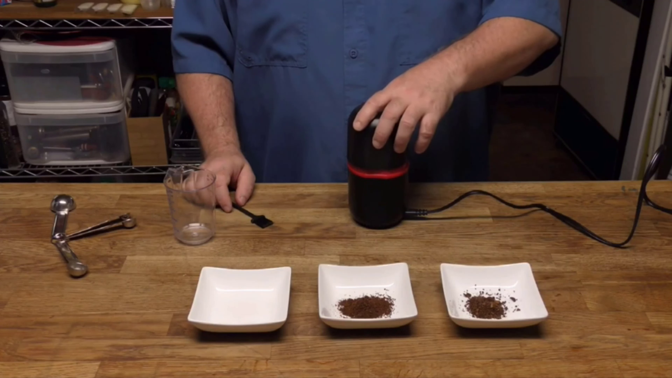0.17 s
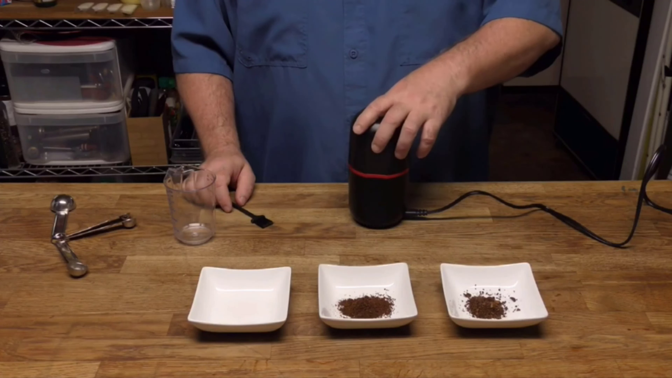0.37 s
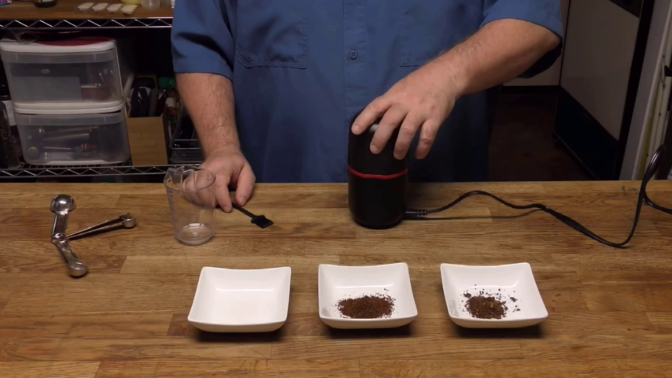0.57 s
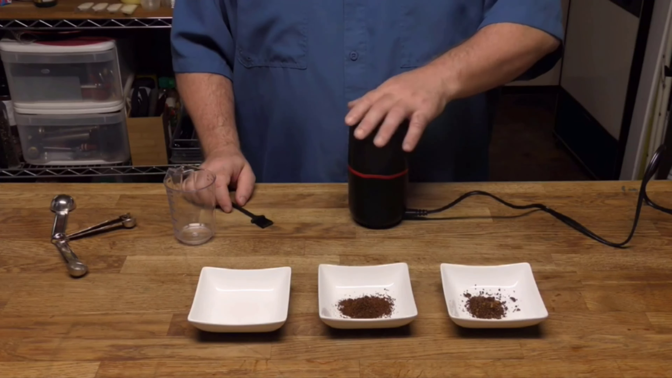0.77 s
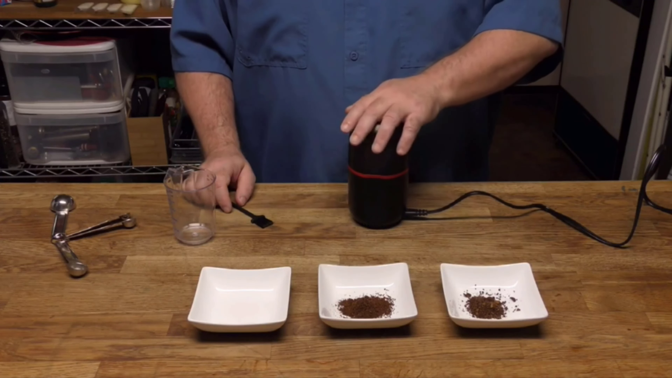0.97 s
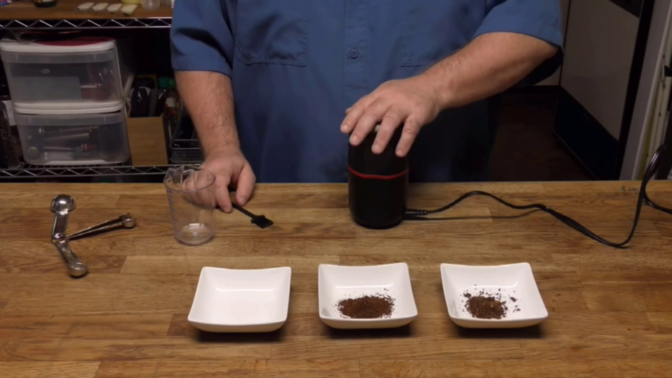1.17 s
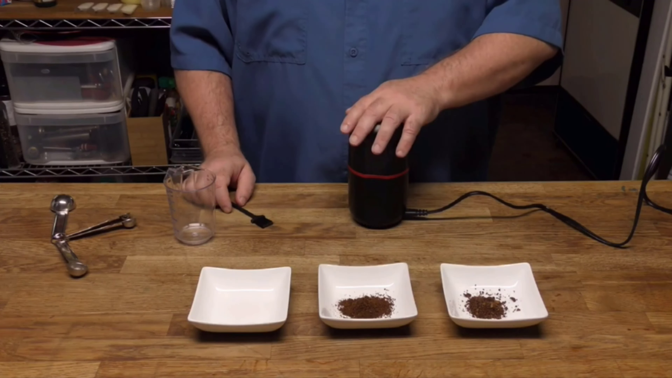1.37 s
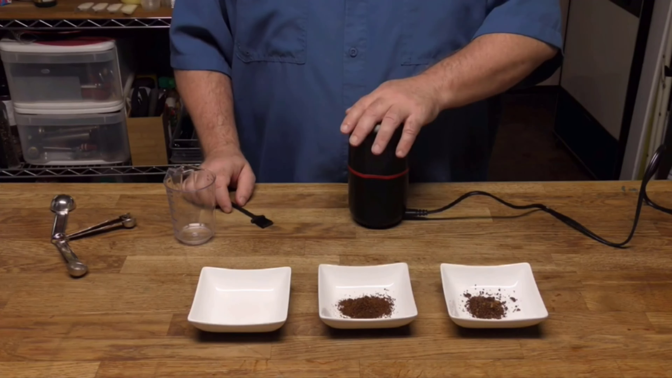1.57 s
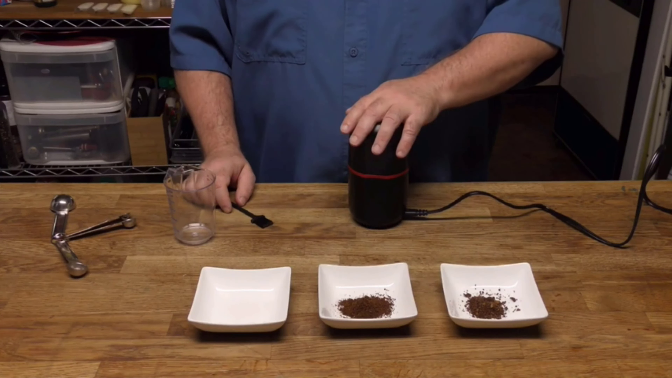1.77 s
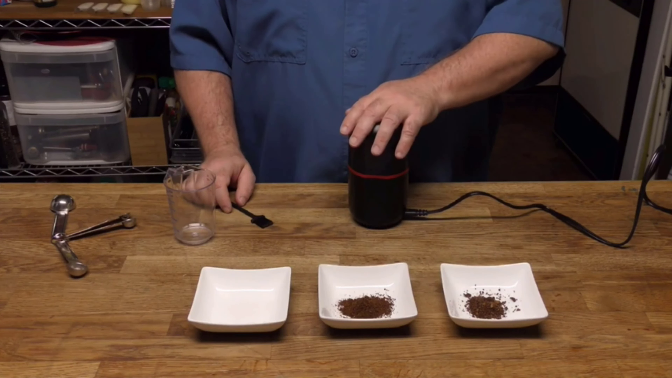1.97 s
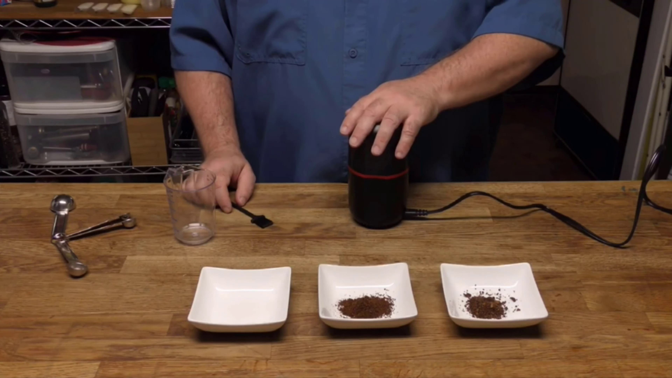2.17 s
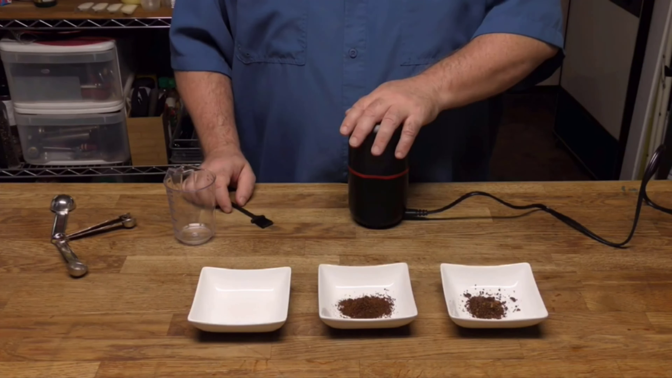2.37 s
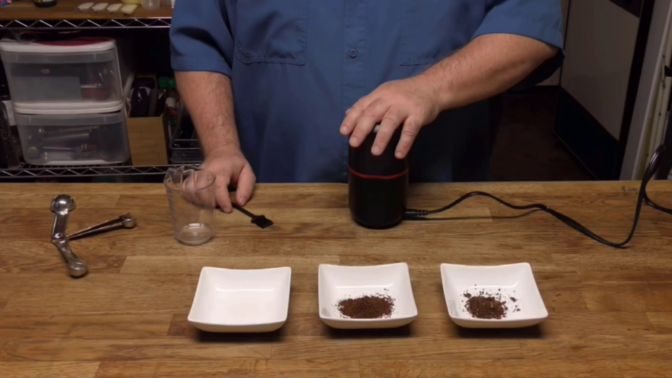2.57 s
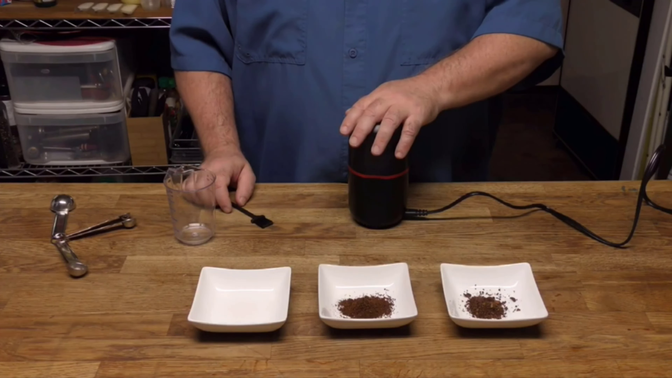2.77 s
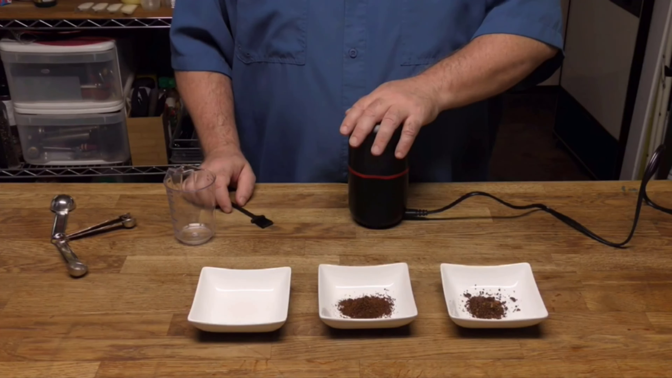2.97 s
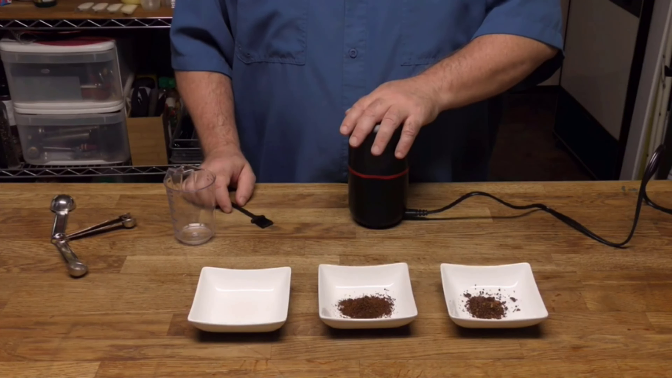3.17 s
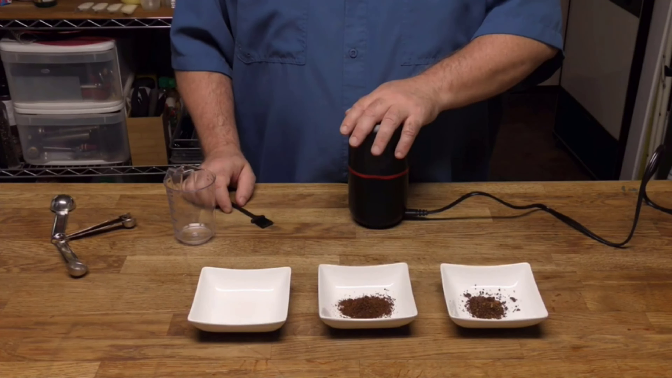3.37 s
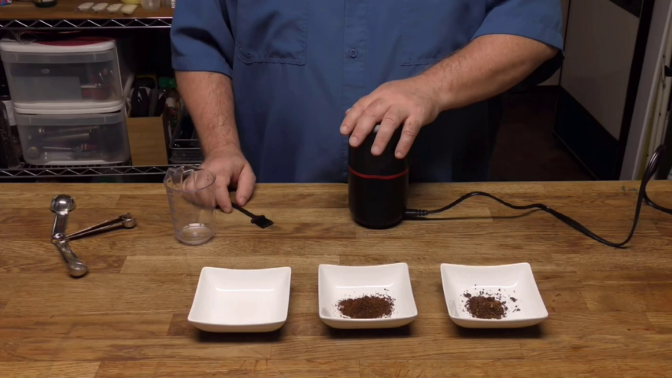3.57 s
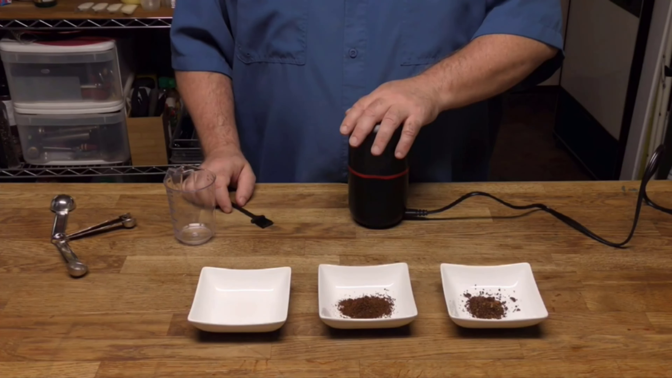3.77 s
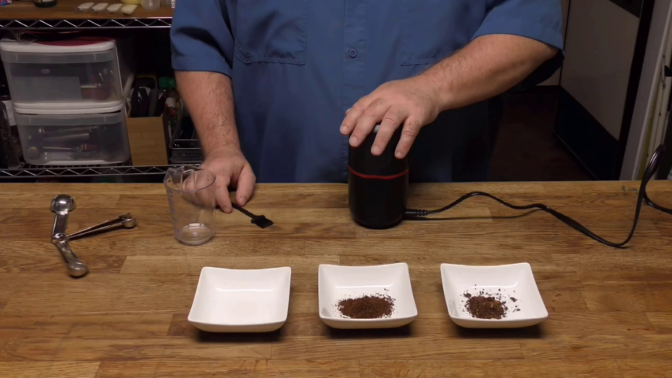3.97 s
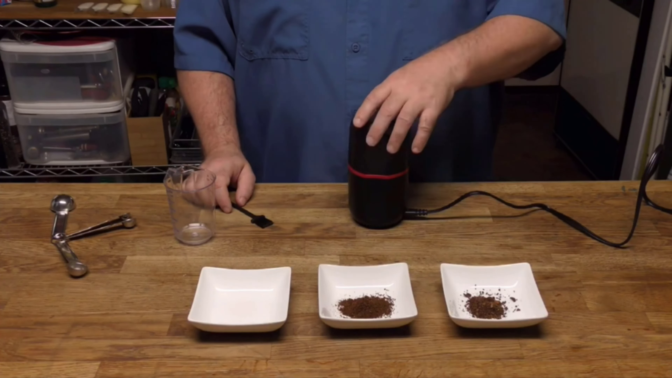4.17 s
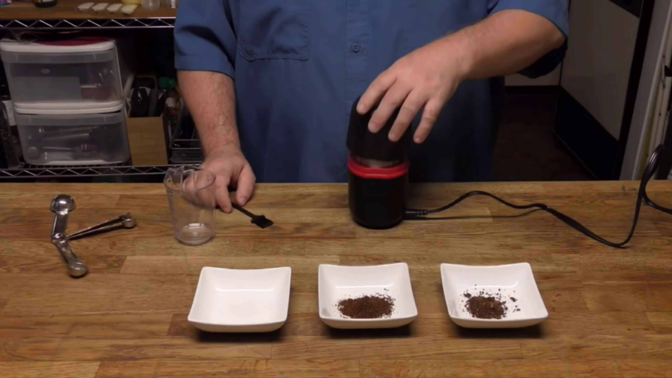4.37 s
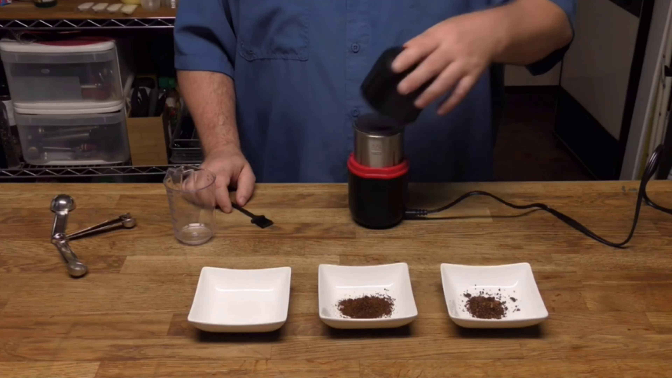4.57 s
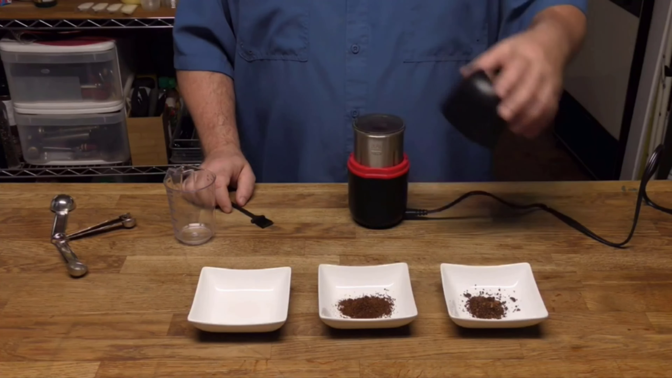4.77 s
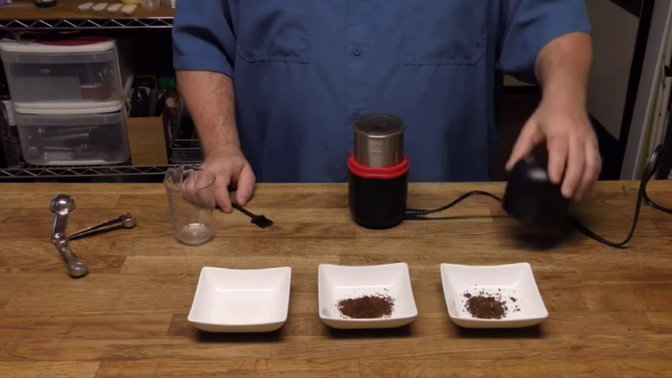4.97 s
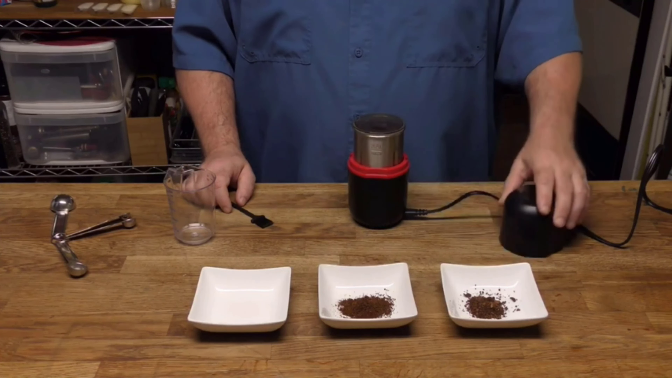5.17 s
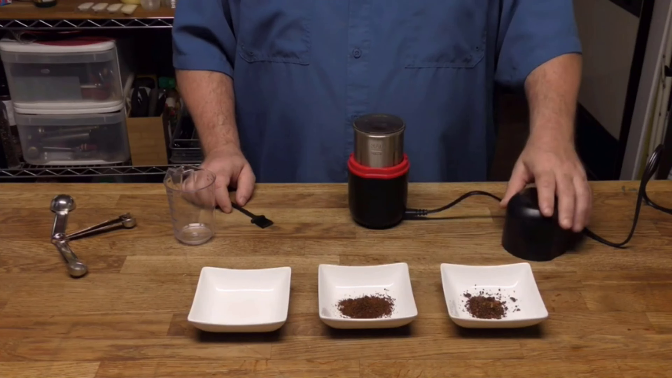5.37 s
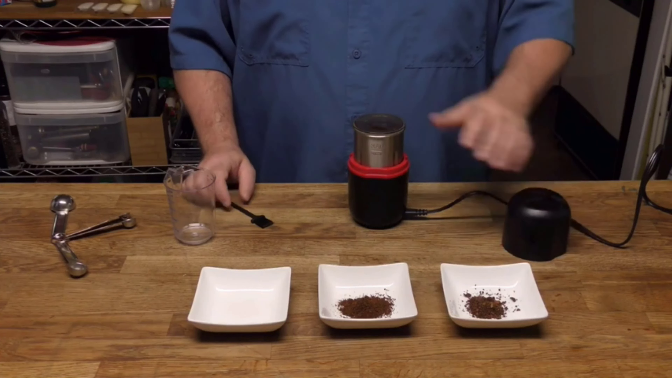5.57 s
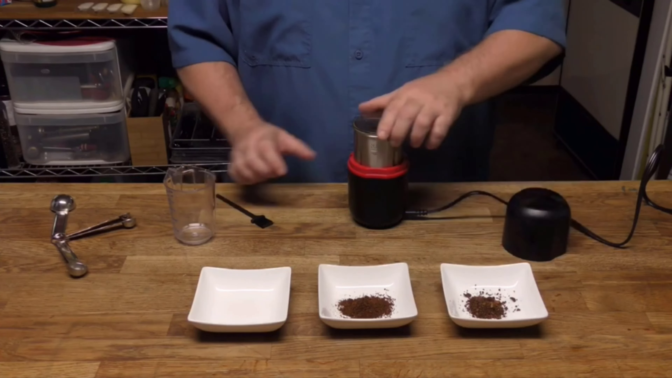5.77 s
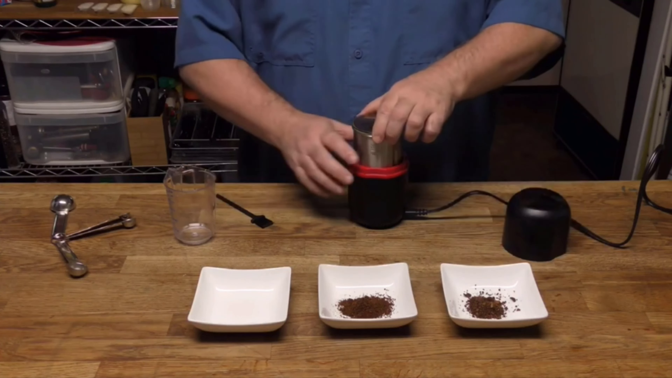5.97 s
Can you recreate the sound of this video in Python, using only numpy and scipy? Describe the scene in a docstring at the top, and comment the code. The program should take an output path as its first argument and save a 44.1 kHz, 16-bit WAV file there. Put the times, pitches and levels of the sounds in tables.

```python
"""A small room with a wooden counter: the plastic lid of an electric blade grinder clacks home and is pressed.
The motor hums, then a whine comes in abruptly and climbs; coffee grit hisses and rattles round the steel cup.
The sound stops short, the lid squeaks off and is set down. Ventilation and an appliance hum behind it.
Spinning parts are sine waves, grit and scrapes are filtered noise, and struck objects are dying sine waves."""
import sys
import numpy as np
from scipy import signal
from scipy.fft import rfft, irfft, next_fast_len
from scipy.io import wavfile
from scipy.ndimage import uniform_filter1d, map_coordinates

SR = 44100
rng = np.random.default_rng(int(sys.argv[2]) if len(sys.argv) > 2 else 0)


def unload_audio(sound):
    """Save the sound as a 16-bit wav file, at the path given as the first command line argument."""
    columns = np.transpose(np.atleast_2d(sound))
    # keep every value between -1 and 1, then stretch to whole-number steps
    steps = np.round(np.clip(columns, -1, 1) * 32767)
    wavfile.write(sys.argv[1], SR, steps.astype(np.int16))


N = 265393

START, STOP = 1.853, 4.083  # the motor runs between these times (s)
WHINE_S = 2.0  # the whine comes in abruptly (s)


def shaft_speed():
    """Turns a second: the shaft races up, levels off and drifts with the drag of the grounds."""
    full_hz = 379.6
    # a quick leap and a slow climb: (speed to gain [Hz], time constant [s])
    spin_up = [(32, .024), (94, .235)]
    # the drag shifts the speed a little: (time [s], shift [Hz])
    drift = [(2.5, 0), (2.7, 3), (3.2, -1.5), (3.45, 1.3), (3.72, 2), (3.85, -2.3)]
    times, shifts = np.transpose(drift)
    drift_hz = np.interp(clock(), times, shifts)
    missing_hz = sum(hz * np.exp(-since(WHINE_S) / lag) for hz, lag in spin_up)
    return full_hz + drift_hz - missing_hz


def motor(angle, shaft_hz):
    """Unbalance sings once a turn; its overtones flutter with the load and pulse with the mains."""
    whine_db = -18.5  # before the response below
    # peaks and dips of housing and room that the whine sweeps through: (frequency [Hz], lift [dB])
    whine_response = [(262, -3.5), (285, 4.5), (308, 1), (318, -5.5), (326, .5), (346, -6), (353, -11),
                      (361, -2), (368, 1.7), (373, 0)]
    # overtones before flutter and pulsing: (multiple of the shaft speed [-], peak level [dB])
    overtone_rows = [(2, -49), (3, -42), (4, -37.5), (5, -46), (6, -43.5), (9, -50), (10, -42), (21, -48),
                     (30, -50)]
    mains = np.sin(2 * np.pi * 120 * clock())

    whine_level = amp(whine_db + along(whine_response, shaft_hz) + 0.58 * wobble(30))
    whine = whine_level * np.sin(angle)

    overtones = np.zeros(N)
    for multiple, db in overtone_rows:
        level = amp(db + 2.5 * wobble(12))
        overtones += level * np.sin(multiple * angle + 0.35 * wobble(35))
    at_speed = np.clip(since(WHINE_S) / 0.26, 0.45, 1)  # the overtones grow as the shaft gathers speed
    overtones = overtones * at_speed * (1 + 0.5 * mains)

    turning = (whine + overtones) * running(WHINE_S, rise=0.0021, fall=0.0013)
    mains_hum = amp(-38) * mains * running(START, rise=0.008, fall=0.012)
    return turning + mains_hum


def brushes(angle):
    """The brushes rasp ten times a turn, hardest as the motor gathers speed; the housing resonates."""
    effort = np.exp(-since(WHINE_S) / 0.25)
    rasp = wobble(380) * np.sin(10 * angle) + wobble(380) * np.cos(10 * angle)
    rasp = unit(coloured(rasp, [(2600, -18), (3100, 3), (3600, 6.5), (3800, -7.5)]))
    return amp(-34) * effort * rasp * running(WHINE_S, rise=0.024, fall=0.002)


def grinding(angle):
    """Coarse bits rattle the housing, large ones shatter, fine grit hisses on the cup; all are tiny strikes."""
    # tone of the coarse bits: (frequency [Hz], relative level [dB])
    rattle_tone = [(50, -15), (85, 9), (150, -5), (260, -1), (560, -4.5), (850, -2.5), (1000, 0),
                   (1900, 5.5), (2500, 0.5), (3200, 3), (4500, 1), (5800, -2), (8000, -52.5)]
    # tone of the fine grit: (frequency [Hz], relative level [dB])
    grit_tone = [(2500, -38), (4800, -5.5), (5900, -5.5), (6300, 1), (8300, 0), (10500, 0.5), (11700, -2),
                 (12500, -4.5), (14500, -8.5), (15800, -16)]
    # resonances of the housing: (frequency [Hz], width [Hz], lift [dB])
    housing = [(1110, 60, 8), (1325, 80, 5), (1770, 130, 3), (2110, 130, 6), (2280, 60, 7), (3080, 100, 3),
               (3395, 60, 6), (3740, 80, 2)]
    # resonances of the steel cup: (frequency [Hz], width [Hz], lift [dB])
    steel_cup = [(6150, 40, 5), (6420, 200, 6), (6880, 130, 5), (7140, 60, 8), (7630, 130, 5),
                 (7950, 90, 7), (8720, 130, 5), (9700, 600, 4), (11370, 200, 5)]
    # the blade catches a larger piece of bean: (time [s], relative level [dB])
    crunches = [(2.175, -31), (2.853, -25), (3.09, -32), (3.275, -27), (3.3, -30), (3.49, -28),
                (3.785, -31), (3.82, -27), (3.928, -23)]
    # a wave of grit is thrown against the cup: (time [s], lift of the hiss [dB])
    surges = [(1.915, 2), (2.02, 2), (3.45, 3.5), (3.82, 3)]
    # relative levels: settled, plus an extra (dB) that fades with a time constant (s) as the beans break down
    rattle_db = -31 + 7 * np.exp(-since(START) / 0.13)
    hiss_db = -28.5 + 4.5 * np.exp(-since(START) / 0.63)
    hiss_db = hiss_db + sum(db * swell(s, length=0.032) for s, db in surges)
    swirl = wobble(45)  # shared by coarse and fine bits

    once_a_turn = 1 + 0.29 * np.sin(angle)
    coarse = impacts(rate=4000, spread_db=2.5) * once_a_turn * amp(0.33 * swirl)
    coarse = amp(rattle_db + 0.51 * wobble(18)) * patchy(coarse, depth_db=0.87)

    crunch_level = sum(amp(db) * swell(s, length=0.014) for s, db in crunches)
    shatter = crunch_level * impacts(rate=1300, spread_db=0.5)

    flung_up = 1 - np.exp(-since(START) / 0.0095)
    fine = impacts(rate=18000, spread_db=2) * amp(0.5 * swirl)
    fine = amp(hiss_db) * flung_up * patchy(fine, depth_db=1.1)
    fine = fine + amp(-4.5) * shatter

    sound = coloured(coarse + shatter, rattle_tone, housing) + coloured(fine, grit_tone, steel_cup)
    sound = amp(-1) * (sound + 0.65 * echoes(sound, within=0.02))
    sound = sound * running(START, rise=0.0041, fall=0.0084)
    return sound + amp(-24.5) * room(sound)


def feet():
    """A push or the motor's kick rocks the grinder on its rubber feet: two low tones die away."""
    # rocking: (time [s], relative level [dB])
    rocking = [(0.327, -20.5), (1.868, -13.5), (1.915, -15.5)]
    sound = np.zeros(N)
    for s, db in rocking:
        add(sound, s, amp(db) * ring([(98.5, -1.0, 0.23), (225.3, -9, 0.23)]))
    return thinned(sound, corner_hz=63)


def lid_contacts():
    """Plastic scrapes and clacks on the grinder, knocking its body; light grazes ring the steel cup."""
    # lid against grinder: (time [s], relative level [dB], scrape 60 dB decay [s], extra knock level [dB])
    contacts = [(0.297, -18, 0.018, 12), (.3, -11.5, 0.14, -10), (.326, -18.5, 0.22, -4),
                (0.332, -27, 0.064, 13), (0.348, -40, .05, 20), (.844, -39.5, .05, -20),
                (1.135, -32.5, 0.044, -20), (1.761, -38, 0.049, -18), (1.843, -28.5, 0.1, -14.5),
                (1.86, -20.5, 0.17, 5), (4.431, -28, 0.18, -20), (4.485, -27.5, 0.17, -18)]
    # tone of the scrapes: (frequency [Hz], relative level [dB])
    clack = [(240, -23), (400, 13), (586, -0.5), (738, 6), (873, -6), (1340, 1), (1550, -2.5), (2130, 3.5),
             (2450, -5), (3400, 0.5), (4630, -6.5), (8930, -8), (15500, -16)]
    # ringing of the grinder's body: (frequency [Hz], relative level [dB], 60 dB decay [s])
    body = [(300.2, -10.5, 0.61), (373, -4.5, 0.12), (474, 4, 0.016), (1098, -14, 0.09), (1467, -13, 0.11),
            (1950, -22, 0.055)]
    # the lid grazes the cup: (time [s], relative level [dB])
    grazes = [(4.433, -41.5), (4.485, -41.5)]
    # ringing of the cup: (frequency [Hz], relative level [dB], 60 dB decay [s])
    cup_ring = [(711, 4.5, 0.15), (1290, -0.5, 0.26), (2800, 5, 0.11)]
    scrapes, knocks, cup = np.zeros(N), np.zeros(N), np.zeros(N)
    for s, db, t60, knock_db in contacts:
        add(scrapes, s, amp(db) * burst(t60))
        add(knocks, s, amp(db + knock_db) * ring(body))
    for s, db in grazes:
        add(cup, s, amp(db) * ring(cup_ring))
    sound = amp(-6.5) * coloured(scrapes, clack) + amp(-9.5) * thinned(knocks, corner_hz=200)
    return sound + amp(-15.0) * room(sound) + cup


def rubbing():
    """Fingers and lid rub on the plastic: each rub is a short swell of tiny slips."""
    # rubs: (time [s], relative level [dB], length [s], centre frequency [Hz])
    rubs = [(.995, -51, .03, 5000), (1.16, -40.5, .03, 2200), (1.45, -55, .04, 8000),
            (1.49, -42.5, .035, 1900), (4.285, -51, .04, 1600), (4.345, -42, .05, 3500),
            (4.378, -42, .04, 3500), (4.462, -43, .02, 6000)]
    sound = np.zeros(N)
    for s, db, length, centre_hz in rubs:
        band = [(centre_hz / 4, -25), (centre_hz / 2, -2), (centre_hz, 0),
                (2 * centre_hz, -7), (5 * centre_hz, -24)]
        slips = coloured(impacts(rate=3000, spread_db=2), band)
        sound += amp(db) * swell(s, length) * slips
    return sound + amp(-16) * room(sound)


def squeak():
    """The lid sticks and slips along the rim, rising in pitch as it comes free."""
    start, attack, hold, fade = 4.307, 0.012, 0.04, 0.031  # s
    from_hz, to_hz, glide = 2200, 2770, 0.085  # the glide is in s
    t = since(start)
    hz = from_hz + (to_hz - from_hz) * np.minimum(t / glide, 1)
    phase = 2 * np.pi * np.cumsum(hz * (1 + 0.045 * wobble(500))) / SR  # the pitch is rough
    tone = np.sin(phase) + amp(-21) * np.sin(2 * phase)
    grip = np.minimum(t / attack, 1) * np.exp(-since(start + attack + hold) / fade)
    sound = amp(-31 + 1.2 * wobble(150)) * tone * grip
    return sound + amp(-8.5) * room(sound)


def lid_set_down():
    """The hollow lid strikes the counter with a sharp tick and chatters to rest ever more softly."""
    # lid on the counter: (time [s], relative level [dB], extra crack level [dB])
    strikes = [(5.1405, -8, -2), (5.1512, -16, -8), (5.163, -26, -4), (5.179, -27, -2), (5.208, -31, -20)]
    # ringing of the hollow lid: (frequency [Hz], relative level [dB], 60 dB decay [s])
    shell_modes = [(285, -20, .38), (440, -26, .18), (570, -11, .05), (650, -1, .04), (700, -21, .12),
                   (900, -8, .03), (1152, -23, .17), (1254, -24, .17), (1730, -7, .015), (1800, -33, .17),
                   (2715, -25, .18)]
    # tone of the cracks: (frequency [Hz], relative level [dB])
    thud = [(130, -34), (260, 10.5), (450, 5.5), (680, 2), (830, -8), (1150, 0), (1750, 1), (2200, -6.5),
            (2750, -1.5), (3700, -15.5), (5300, -16), (9500, -26.5), (15500, -41)]
    cracks, shell, tick = np.zeros(N), np.zeros(N), np.zeros(N)
    for s, db, crack_db in strikes:
        add(cracks, s, amp(db + crack_db) * burst(0.017))
        add(shell, s, amp(db) * ring(shell_modes))
    add(tick, strikes[0][0], amp(-23.5) * burst(0.018))  # on the first strike only
    cracks = coloured(cracks, thud)
    shell = thinned(shell, corner_hz=292)
    shell = shell + amp(-14) * room(shell)
    return shell + cracks + room(cracks) + thinned(tick, corner_hz=11000)


def background():
    """Ventilation noise and the unsteady hum of an appliance; both sink a little while the motor runs."""
    # tone of the ventilation: (frequency [Hz], relative level [dB])
    air_tone = [(13, -59), (22, -19), (49, -14), (80, -7.5), (115, 0.5), (147, -6.5), (173, -8.5),
                (385, -12), (418, -14.5), (521, -16.5), (787, -27.5), (1130, -25), (2060, -27.5),
                (4580, -41), (15800, -42)]
    # resonances in the ventilation: (frequency [Hz], width [Hz], lift [dB])
    air_peaks = [(57.5, 10, 6.5), (90, 14, 0.5), (264.8, 15, 9.5), (1110, 140, 3), (2140, 85, 4.5)]
    # tones of the appliance: (frequency [Hz], relative level [dB])
    hum_tones = [(118.4, -50), (177.6, -44), (236.9, -49.5), (613.7, -59.5)]
    air = amp(-40) * coloured(rng.standard_normal(N), air_tone, air_peaks)
    hum = np.zeros(N)
    for hz, db in hum_tones:
        level = amp(db + 0.5 + 0.19 * wobble(3.9))
        hum += level * np.sin(2 * np.pi * hz * clock() + 0.73 * wobble(5))
    sink_db = -4 * running(START, rise=0.51, fall=0.0081)
    return (air + hum) * amp(sink_db)


def room(x):
    """The walls' answer: noise in which each frequency dies at its own speed."""
    # how long the room rings: (frequency [Hz], 60 dB decay [s])
    decay_times = [(100, 0.47), (350, 0.63), (2000, 0.55), (6000, 0.45), (14000, 0.17)]
    hz, t, z = signal.stft(rng.standard_normal(SR // 2), SR, nperseg=256)
    decay = np.exp(-np.log(1000) * t / along(decay_times, hz)[:, None])
    tail = signal.istft(z * decay, SR, nperseg=256)[1]
    tail = tail * (1 - np.exp(-np.arange(len(tail)) / SR / 0.0024))  # a soft start
    return signal.fftconvolve(x, tail / np.linalg.norm(tail))[:N]


def echoes(x, within, count=24):
    """Close reflections off counter and walls carve fine, fixed peaks into a sound."""
    taps = np.zeros(SR // 10)
    lags = rng.uniform(0.001, min(within, 0.09), count)
    taps[(lags * SR).astype(int)] = rng.standard_normal(count)
    return signal.fftconvolve(x, taps / np.linalg.norm(taps))[:N]


def impacts(rate, spread_db):
    """Random tiny strikes of uneven size, about rate a second, scaled to rms 1."""
    struck = rng.random(N) < rate / SR
    return unit(struck * rng.standard_normal(N) * amp(spread_db * rng.standard_normal(N)))


def patchy(x, depth_db):
    """Different pitches swell and fade as the grounds tumble; scaled to rms 1."""
    z = signal.stft(x, nperseg=512)[2]
    field = uniform_filter1d(rng.standard_normal(z.shape), size=6, axis=0)  # smooth over pitch
    field = uniform_filter1d(field, size=9, axis=1)  # smooth over time
    return unit(signal.istft(z * amp(depth_db * unit(field)), nperseg=512)[1][:N])


def ring(modes):
    """Half a second of dying sine waves, as from a struck object."""
    t = np.arange(SR // 2) / SR
    return sum(amp(db) * np.exp(-np.log(1000) * t / t60) * np.sin(2 * np.pi * hz * t)
               for hz, db, t60 in modes)


def burst(t60):
    """Half a second of noise that dies by 60 dB in t60 seconds."""
    t = np.arange(SR // 2) / SR
    return rng.standard_normal(len(t)) * np.exp(-np.log(1000) * t / t60)


def thinned(x, corner_hz):
    """A small object radiates little bass, so a high-pass filter takes it away."""
    return signal.sosfilt(signal.butter(N=2, Wn=corner_hz, btype="high", fs=SR, output="sos"), x)


def coloured(x, spectrum, peaks=()):
    """x through a causal filter of mean power 1: a broad spectrum with resonances on top."""
    m = 2 * next_fast_len(len(x) // 2 + 8192)
    hz = np.fft.rfftfreq(m, 1 / SR)
    db = along(spectrum, hz)
    for centre, width, lift in peaks:
        db = db + lift / (1 + (2 * (hz - centre) / width) ** 2)
    # folding the cepstrum forward makes the filter answer only after its input
    cepstrum = irfft(np.log(unit(amp(db)) + 1e-6))
    cepstrum[1:m // 2] *= 2
    cepstrum[m // 2 + 1:] = 0
    return irfft(rfft(x, m) * np.exp(rfft(cepstrum)))[:len(x)]


def running(begin, rise, fall):
    """Ramps to 1 from begin on and dies away after the motor stops; rise and fall in seconds."""
    return np.minimum(since(begin) / rise, 1) * np.exp(-since(STOP) / fall)


def swell(s, length):
    """A quick rise to 1 at time s and a slower fade."""
    u = (clock() - s) / length
    return np.exp(np.maximum(np.minimum(3 * u, -u), -30))


def wobble(rate):
    """A smooth random curve, rate knots a second."""
    return map_coordinates(rng.standard_normal(int(N * rate / SR) + 4), [clock() * rate])


def clock():
    """The time of every sample in seconds."""
    return np.arange(N) / SR


def since(s):
    """Seconds gone by since time s, 0 before it."""
    return np.maximum(clock() - s, 0)


def along(points, hz):
    """Reads (Hz, value) points at hz, with straight lines on a log frequency axis."""
    f, v = np.transpose(points)
    return np.interp(np.log(hz + 1), np.log(f + 1), v)


def amp(db):
    """Decibels to gain."""
    return 10 ** (np.asarray(db) / 20)


def unit(x):
    """Scaled to rms 1."""
    return x / np.sqrt(np.mean(x ** 2) + 1e-20)


def add(track, s, sound):
    """Mix a sound in at time s."""
    part = track[round(s * SR):][:len(sound)]
    part += sound[:len(part)]


def scene():
    """Everything reaches one microphone, alike in both channels."""
    shaft_hz = shaft_speed()
    angle = 2 * np.pi * np.cumsum(shaft_hz) / SR
    grinder = motor(angle, shaft_hz) + brushes(angle) + grinding(angle) + feet()
    handling = lid_contacts() + rubbing() + squeak() + lid_set_down()
    sound = grinder + handling + background()
    return np.array([sound, sound])


def record(dry):
    """The recorder keeps nothing above its band limit."""
    top_hz = 15800
    m = next_fast_len(N + SR // 2)
    kept = np.fft.rfftfreq(m, 1 / SR) < top_hz
    return irfft(rfft(dry, m) * kept, m)[:, :N]


dry = scene()
out = record(dry)
unload_audio(out)
```